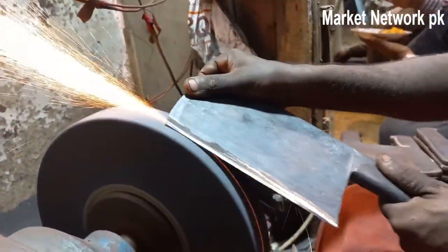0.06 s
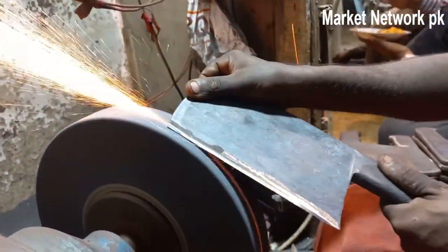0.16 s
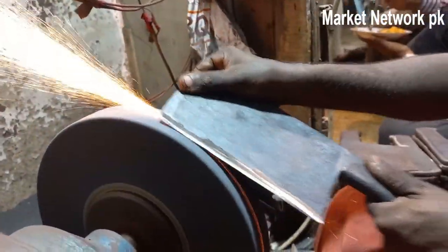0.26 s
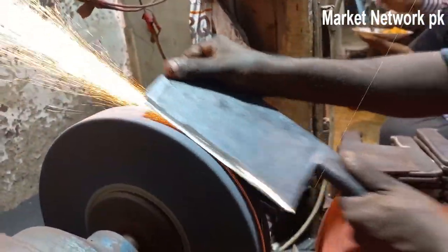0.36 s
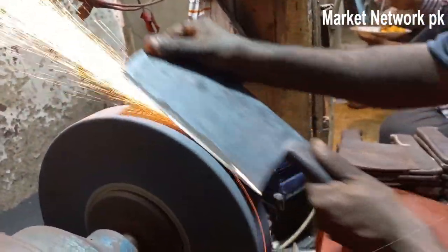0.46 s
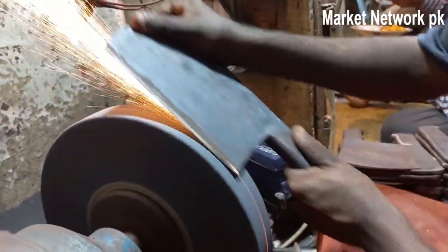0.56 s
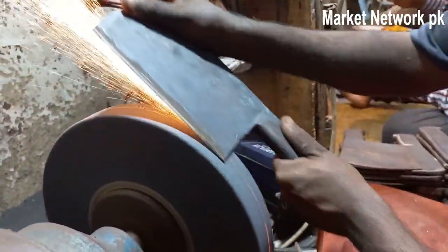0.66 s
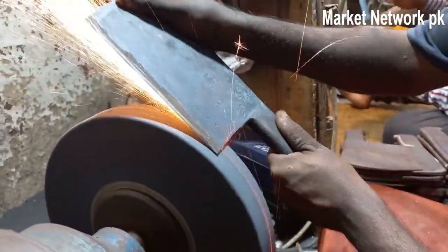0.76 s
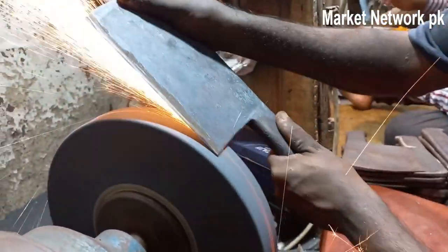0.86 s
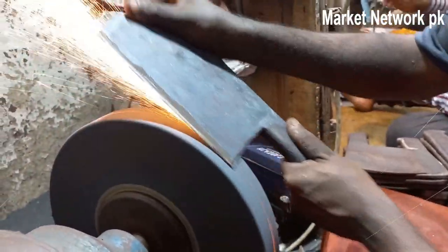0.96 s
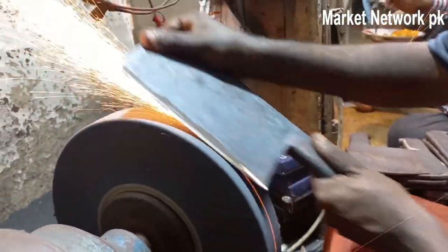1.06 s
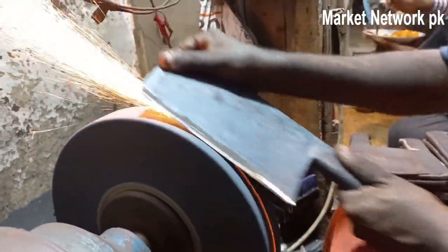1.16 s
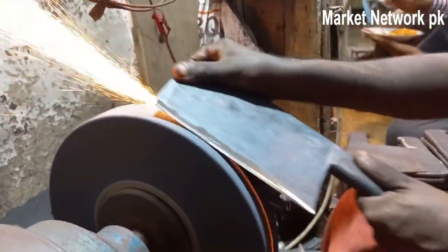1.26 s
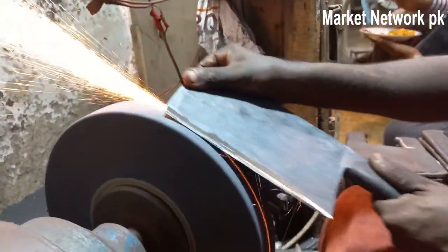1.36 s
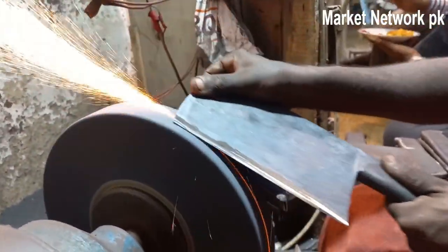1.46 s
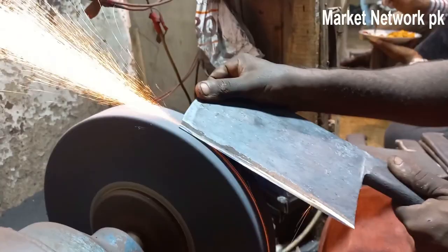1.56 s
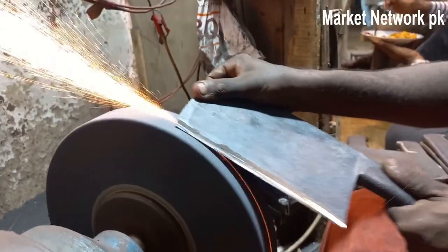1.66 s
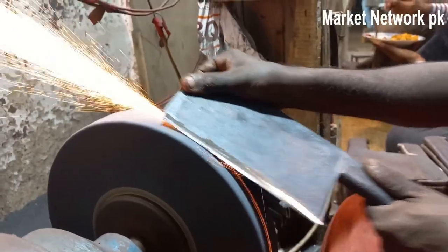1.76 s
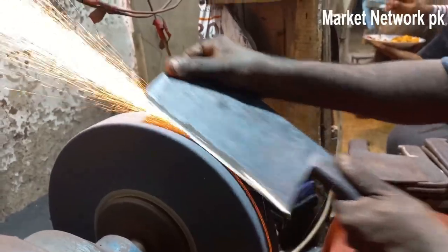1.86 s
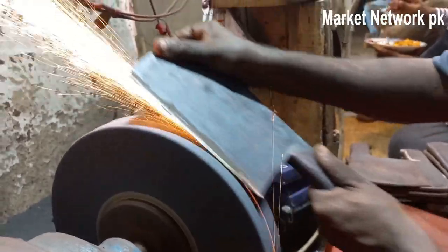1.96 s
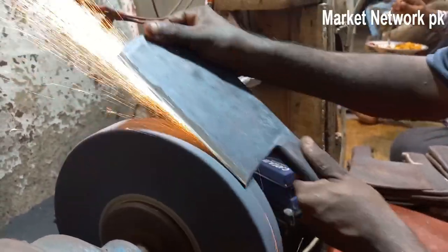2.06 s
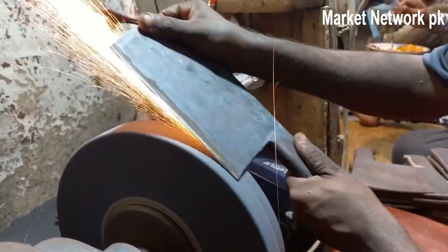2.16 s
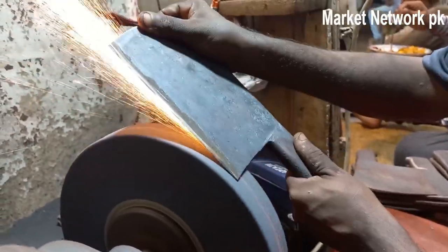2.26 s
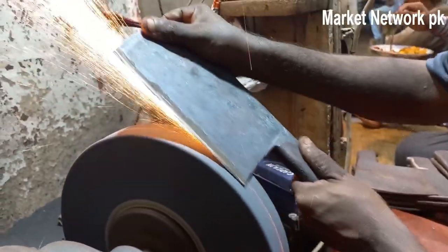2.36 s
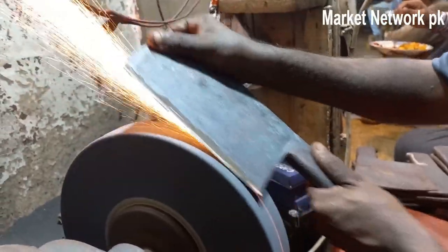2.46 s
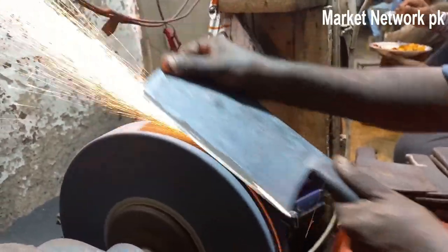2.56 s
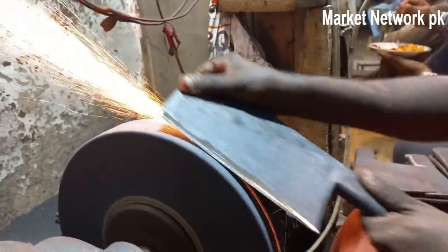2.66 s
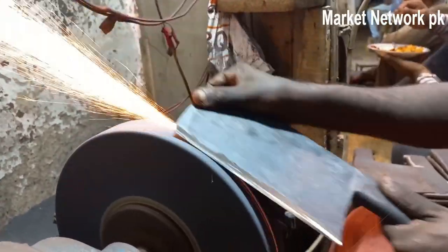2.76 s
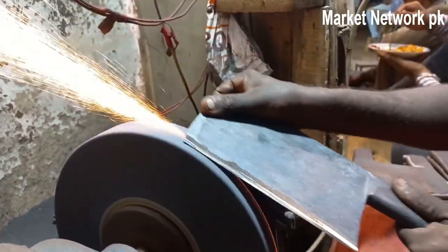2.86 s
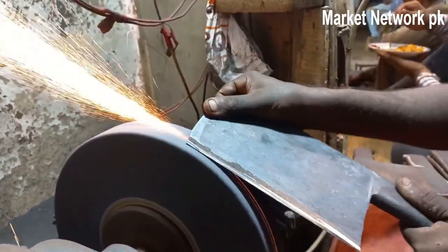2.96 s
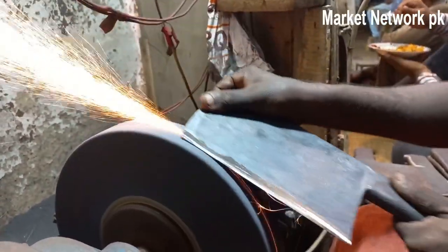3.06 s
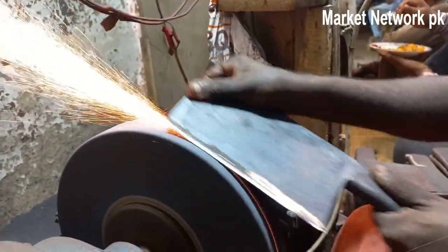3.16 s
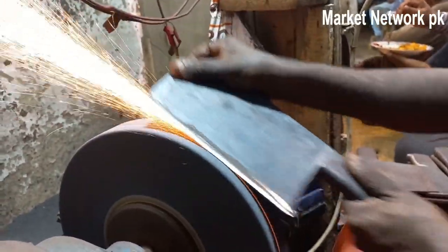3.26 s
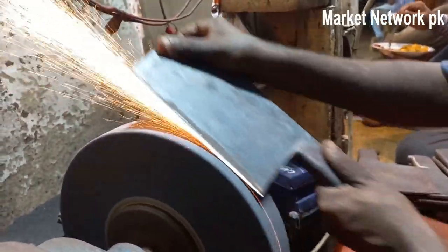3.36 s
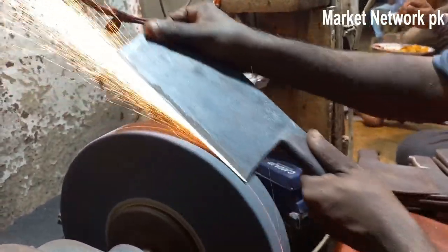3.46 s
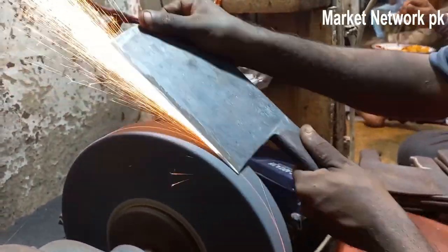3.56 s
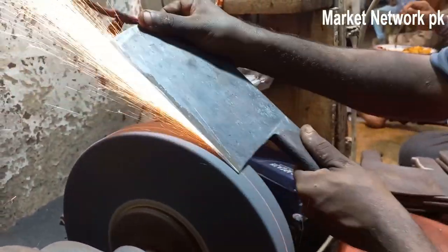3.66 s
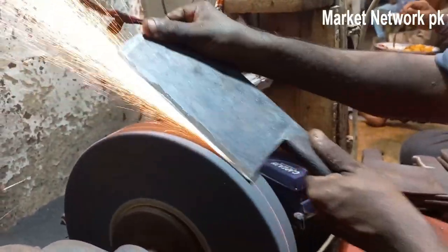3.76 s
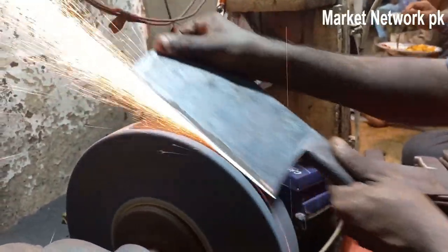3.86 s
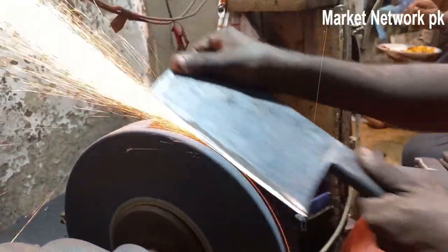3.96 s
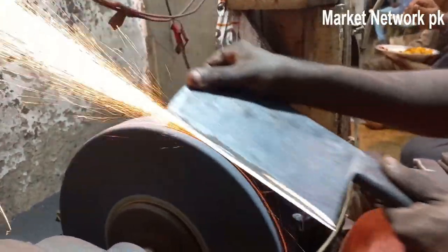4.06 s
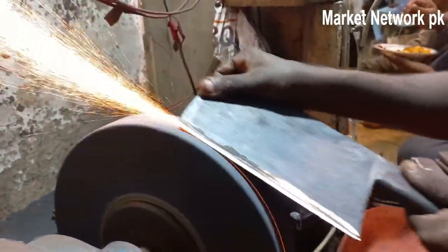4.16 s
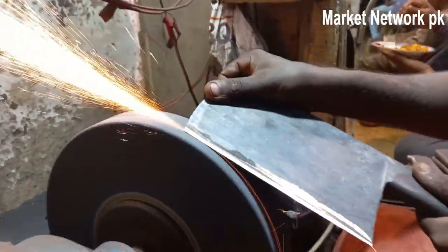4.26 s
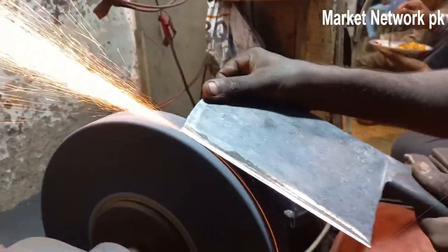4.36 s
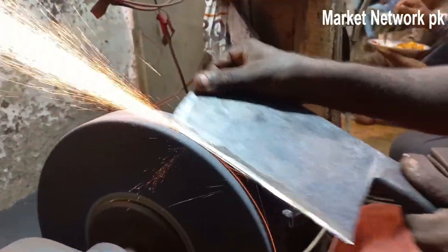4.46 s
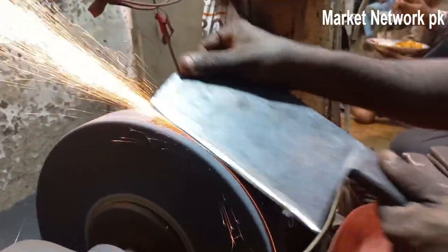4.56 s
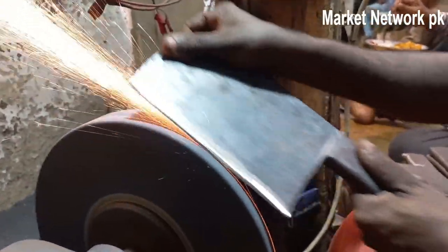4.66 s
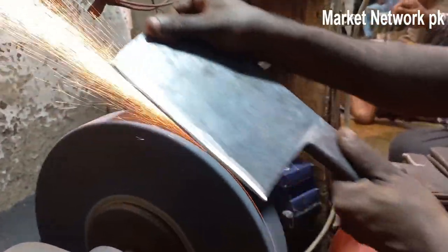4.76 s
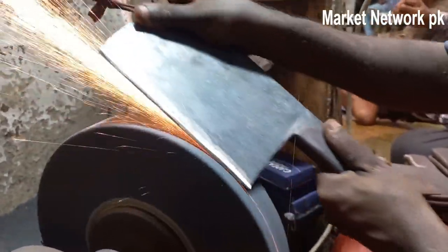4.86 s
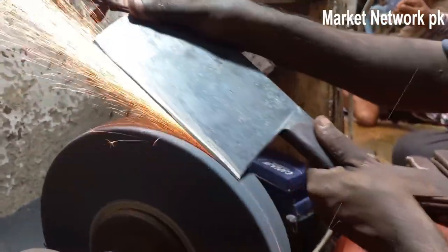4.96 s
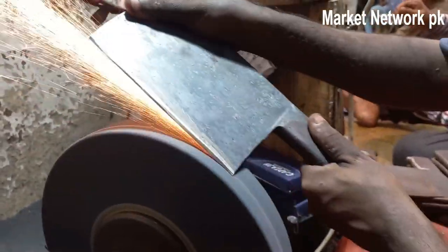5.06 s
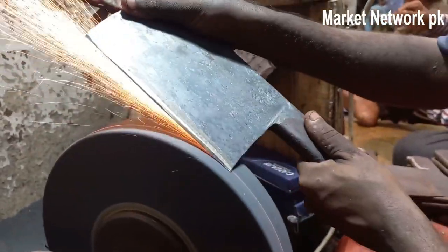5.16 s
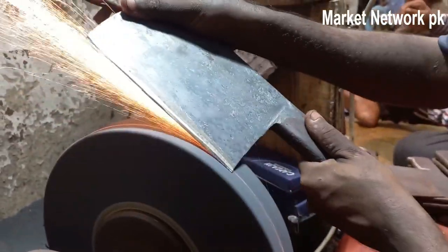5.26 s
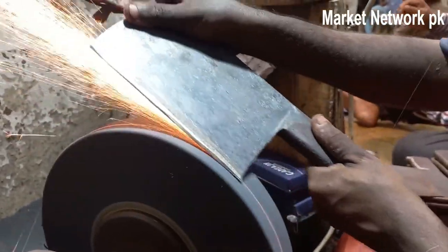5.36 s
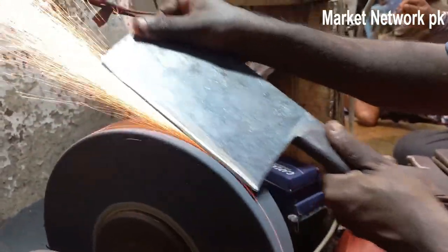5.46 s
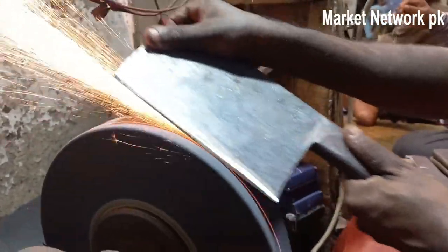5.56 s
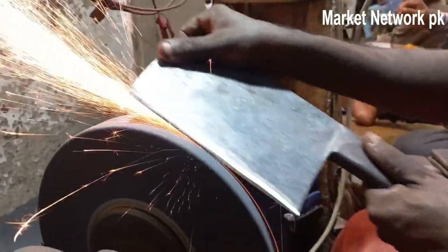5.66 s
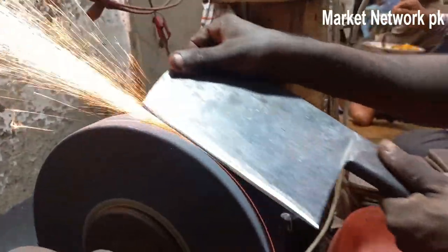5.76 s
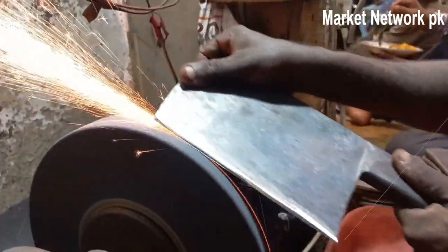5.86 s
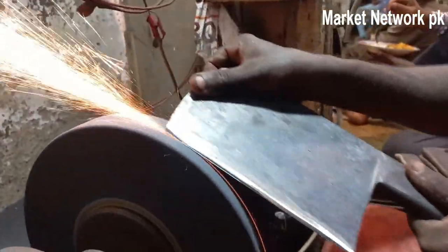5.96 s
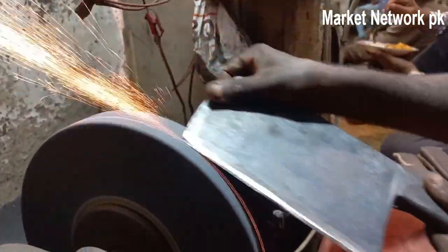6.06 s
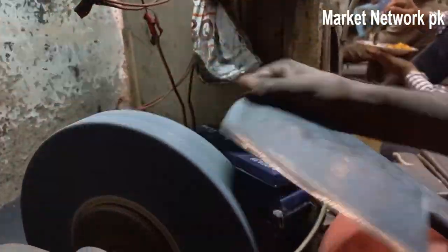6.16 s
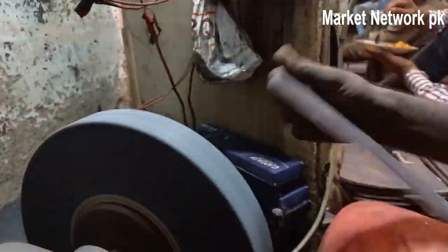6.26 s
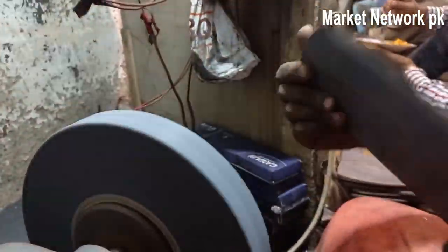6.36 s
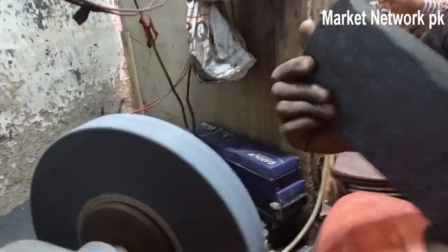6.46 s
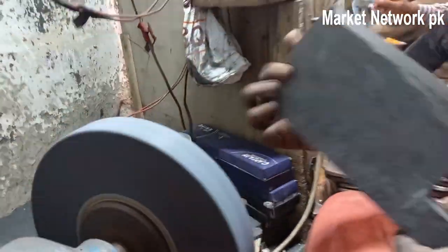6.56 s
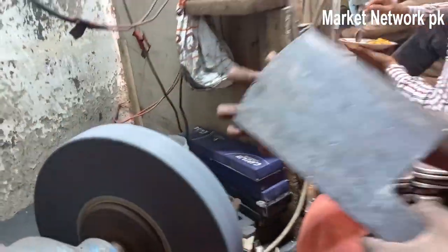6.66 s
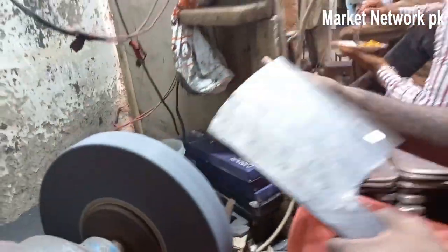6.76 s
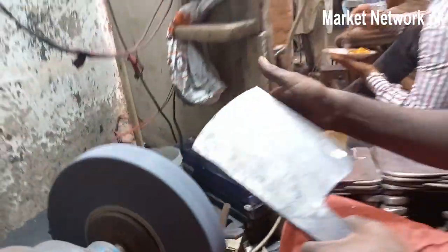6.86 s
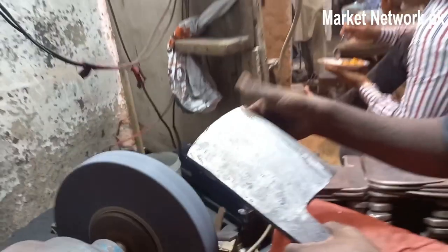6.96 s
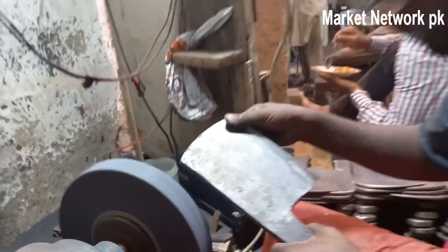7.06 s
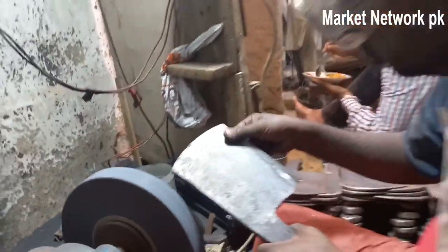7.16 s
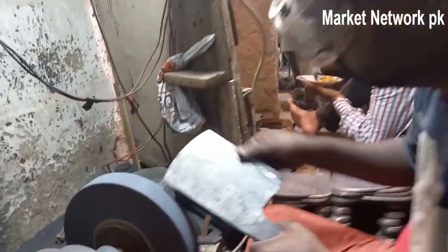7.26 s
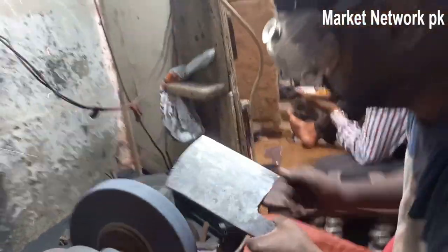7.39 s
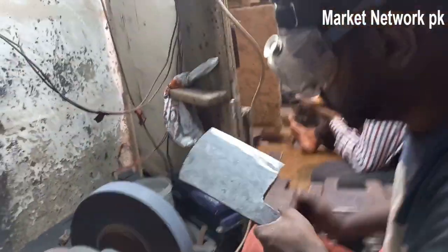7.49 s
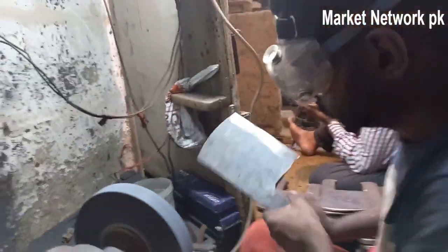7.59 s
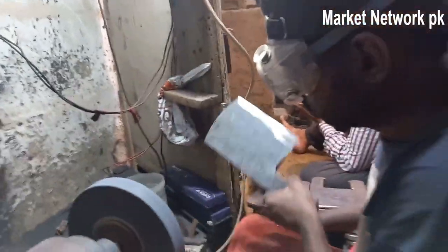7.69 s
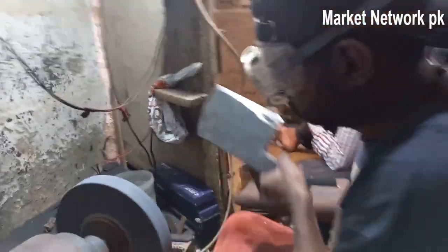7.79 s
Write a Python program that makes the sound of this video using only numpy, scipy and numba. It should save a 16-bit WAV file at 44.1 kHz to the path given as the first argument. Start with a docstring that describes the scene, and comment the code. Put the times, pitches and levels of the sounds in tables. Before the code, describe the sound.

Very close to the microphone in a small workshop, a broad steel blade is drawn back and forth over a motor-driven grinding wheel. The harsh, bright, gritty hiss stays nearly even in loudness while its metallic colour shifts with each stroke. Low wind puffs buffet the microphone over motor rumble. Around six seconds the blade bounces off, leaving a hum, then a light knock and steel clink further away.

```python
"""Cleaver on a grinding wheel

In a small workshop a steel cleaver is drawn to and fro, tip to heel, over a motor-driven wheel, close to the microphone.
Grit noise drives the blade's resonances, each by its own amount at the point of contact; a low drone comes and goes.
Rumble, rushing air and motor tones are shaped noise, and gusts from the wheel buffet the microphone in low puffs.
The blade is lifted, the grinder hums on, and a light knock and a steel clink, cracks with ringing modes, follow further off."""
import sys
import numpy as np
from scipy import signal
from scipy.fft import rfft, irfft, next_fast_len
from scipy.io import wavfile
from scipy.ndimage import uniform_filter1d
from numba import njit

SR = 44100
rng = np.random.default_rng(int(sys.argv[2]) if len(sys.argv) > 2 else 0)


def wrap_up_sound(samples):
    """Save the sound to the file named by the first command line argument, as 16-bit audio."""
    columns = np.atleast_2d(samples).T
    # keep every value between -1 and 1, then stretch to whole-number steps
    tamed = np.clip(columns, -1, 1)
    steps = np.round(tamed * 32767).astype(np.int16)
    wavfile.write(sys.argv[1], SR, steps)


N = 345303
TIME = np.arange(N) / SR   # seconds


def from_db(db):
    """Decibels to gain."""
    return 10 ** (np.asarray(db) / 20)


def rms_one(x):
    """Scale to rms 1."""
    return x / np.sqrt(np.mean(x ** 2) + 1e-20)


def in_time(rows):
    """A curve of (time [s], value) rows, joined by straight lines, at every sample."""
    return np.interp(TIME, *np.transpose(rows))


def drift(rate_hz):
    """Slow random wandering with spread 1: noise through two equal low-pass poles."""
    step = 40   # samples between the slow points
    pole = np.exp(-2 * np.pi * rate_hz * step / SR)
    settling = 2000   # points dropped while the filter settles
    noise = rng.standard_normal(N // step + settling + 2)
    slow = rms_one(signal.lfilter([1], [1, -2 * pole, pole ** 2], noise)[settling:])
    return np.interp(np.arange(N) / step, np.arange(len(slow)), slow)


def colour(x, spectrum):
    """Shape a sound by (frequency [Hz], level [dB]) points, joined on a log-frequency scale; rms 1."""
    hz, db = np.transpose(spectrum)
    size = next_fast_len(N)
    bins_hz = np.maximum(np.fft.rfftfreq(size, 1 / SR), 1)
    gain = from_db(np.interp(np.log(bins_hz), np.log(hz), db))
    return rms_one(irfft(rfft(x, size) * gain, size)[:N])


@njit
def glide(x, cosine, r):
    """A two-pole resonance with gain 1 on top, whose centre and damping move."""
    y = np.zeros(len(x))
    for i in range(2, len(x)):
        driven = (1 - r[i] ** 2) / 2 * (x[i] - x[i - 2])
        ringing = 2 * r[i] * cosine[i] * y[i - 1] - r[i] ** 2 * y[i - 2]
        y[i] = driven + ringing + 1e-18
    return y


def resonate(x, hz, width_hz, skirt):
    """A resonance, steady or moving, then one skirt times as wide that darkens its flanks."""
    cosine = np.cos(2 * np.pi * hz / SR) * np.ones(N)
    loss = np.pi * width_hz / SR * np.ones(N)
    narrow = glide(x, cosine, 1 - loss)
    return glide(narrow, cosine, 1 / (1 + skirt * loss))


def fade(x, seconds):
    """Each click becomes a step that dies away with this time constant."""
    return signal.lfilter([1], [1, -np.exp(-1 / (seconds * SR))], x + 1e-18)


def clicks(events):
    """One click for each (time [s], level [dB]) row."""
    out = np.zeros(N)
    for time_s, db in events:
        out[round(time_s * SR)] += from_db(db)
    return out


def contact_point():
    """Where the edge meets the wheel, 0 tip to 1 heel: even slides and rests, with rounded turns."""
    # strokes of the hand: (start [s], length [s], point of contact reached [0 tip - 1 heel])
    slides = [(0.0, 0.14, 0.043), (.3, 0.43, 0.868), (.97, 0.48, .07), (1.77, 0.49, .83), (2.42, 0.51, .05),
              (3.141, 0.47, 0.8), (3.83, 0.475, 0.027), (4.5, 0.64, 0.91), (5.31, 0.73, 0.034)]
    turn_s = 0.085   # time the hand takes to start or stop
    place = 0.19     # first point of contact
    corners = []
    for start, length, reached in slides:
        corners += [(start, place), (start + length, reached)]
        place = reached
    return uniform_filter1d(in_time(corners), size=round(turn_s * SR))


def wheel_face(pounding_db, keep, grain_db, uneven_db, wander_s):
    """Force of the grit: grains of all sizes, which partly come round again on the next turn; rms 1."""
    wheel_hz = 49.3   # turns per second
    turn = round(SR / wheel_hz)
    shape = (N // turn + 1, turn)   # one row for each turn
    grains = rng.standard_normal(shape) * from_db(grain_db * rng.standard_normal(shape))
    worn = signal.lfilter([1], [1, -np.clip(keep, 0, .9)], grains, axis=0)
    high_spots = rms_one(uniform_filter1d(rng.standard_normal(turn), size=60, mode="wrap"))
    face = (worn * from_db(uneven_db * high_spots)).ravel()
    # the turning runs a little early and late
    passing = (TIME + wander_s * drift(.5)) * SR
    # once a turn the rim bites suddenly and eases off
    runout = .5 - passing / turn % 1
    grit = face[passing.astype(int) % len(face)]
    return rms_one(grit * from_db(pounding_db * runout))


def pinned_edge(force, place):
    """Broad resonances of the edge pinned on the wheel, which rise as the contact moves heelwards."""
    # each swells and fades over a stretch of the edge:
    # (from point [0 tip - 1 heel], to point [0 - 1], from [Hz], to [Hz], relative level [dB])
    pinned = [(0.094, .6, 990, 1516, -39), (0.12, 0.623, 1950, 3160, -27), (0.18, .75, 3210, 4890, -26),
              (0.012, 0.383, 5150, 6300, -25)]
    out = np.zeros(N)
    for first, last, low_hz, high_hz, db in pinned:
        along = np.clip((place - first) / (last - first), 0, 1)
        centre_hz = low_hz + (high_hz - low_hz) * along
        ringing = resonate(force, centre_hz, width_hz=118, skirt=2.9)
        out += from_db(db) * np.sin(np.pi * along) * rms_one(ringing)
    return out


def grinding(skips_per_s, skip_db, skip_s, seat_db, bend_hz, wobble_hz, scratch_db, skirt, waver_db):
    """Grit drives each mode by its shape at the contact; the edge skips and seats itself anew."""
    # bending modes of the blade: (frequency [Hz], width [Hz], then eight relative levels [dB]
    # when ground at evenly spaced points from tip to heel)
    blade_modes = [(470, 250, -55, -58, -43, -36.5, -38, -48.5, -58.5, -39),
                   (978, 21, -33.5, -34, -32.5, -47, -41, -44.5, -50, -38),
                   (1155, 110, -36.5, -37, -54, -54, -61, -37, -51.5, -51),
                   (1325.4, 28, -33, -41, -32, -33.5, -42.5, -37, -35, -29.5),
                   (1889, 58, -54, -51, -35.5, -25.5, -32.5, -34.5, -52, -55),
                   (2126, 64, -39.5, -33, -43, -31.5, -37, -36, -49, -36),
                   (2254, 104, -31, -29, -21.5, -22.5, -27.5, -38, -29.5, -38),
                   (2647, 102, -24, -26, -28.5, -17, -28.5, -18, -22.5, -21),
                   (2900, 160, -58, -37, -54, -26.5, -47.5, -26.5, -24.5, -39),
                   (3496, 52, -16.5, -22.5, -28, -21, -28.5, -30.5, -27.5, -24.5),
                   (3674, 79, -25.5, -25.5, -50, -23, -63, -26, -32, -47),
                   (3934, 87, -26.5, -25, -19.5, -20.5, -23, -27, -26.5, -36),
                   (4510, 130, -22, -32, -29, -22, -22, -19, -23.5, -17),
                   (5020, 41, -46, -27.5, -23.5, -20.5, -38, -28, -29, -22),
                   (5390, 71, -26, -27, -32.5, -21.5, -27, -27, -29, -52),
                   (5744, 64, -21.5, -24.5, -18.5, -21, -20, -21, -27.5, -11.5),
                   (6270, 60, -23.5, -35, -26, -25, -46, -27, -30.5, -30),
                   (6660, 64, -31.5, -28, -47, -32, -24.5, -55, -27.5, -28),
                   (6860, 107, -34, -28, -23, -20, -24, -53, -28.5, -32),
                   (7470, 68, -25, -25.5, -22, -24, -27, -26, -39, -53),
                   (8010, 93, -31, -24.5, -27, -25, -28, -24.5, -21.5, -18.5),
                   (8870, 130, -30, -32.5, -27, -43, -27.5, -31, -32.5, -19),
                   (9306, 160, -28, -23, -26, -22.5, -25.5, -28.5, -28.5, -36),
                   (9920, 150, -31, -40, -25, -46, -36, -36, -22, -32),
                   (10330, 92, -33.5, -23, -24, -27, -24.5, -24, -20.5, -43),
                   (10780, 110, -36, -53, -39, -33, -36, -30, -32, -33),
                   (11350, 180, -37, -33.5, -27, -40, -37, -49, -32.5, -41),
                   (11630, 85, -47, -36, -41, -32, -37, -33, -40, -48),
                   (12180, 86, -35, -27.5, -31, -28.5, -27, -31, -29, -34),
                   (13040, 75, -35, -34, -27, -24, -40, -31, -23, -37),
                   (13520, 120, -38, -36, -39, -39, -39, -43, -41, -38),
                   (13900, 90, -41, -34, -41, -44, -30, -40, -41, -45),
                   (14500, 120, -44, -33, -43, -40, -44, -43, -35, -38),
                   (14800, 58, -31, -40, -30, -24.5, -31, -31, -25.5, -27)]
    # hiss of the grit itself: (frequency [Hz], relative density [dB per Hz])
    scratch_colour = [(400, -34), (800, -18.5), (1600, -4.5), (2400, 8), (4000, -6), (7000, -13),
                      (10500, -3), (12800, 4.5), (15500, 6)]
    # the edge bounces as it leaves the wheel: (time [s], added force over the steady force [dB])
    bounces = [(6.110, 10), (6.138, -7), (6.164, 14)]
    lift_s = 6.172       # the blade leaves the wheel
    grind_db = -12       # level of the evened grinding
    free_width_hz = 20   # width of the blade's modes once it is off the wheel

    place = contact_point()
    touching = TIME < lift_s
    skips = rng.random(N) < skips_per_s / SR
    seating = np.cumsum(skips)
    # each landing bites harder for a moment
    bites = from_db(skip_db) * skips * np.minimum(rng.exponential(1, N), 3)
    landing = fade(bites + clicks(bounces), skip_s)

    # the stiff heel follows the out-of-round wheel worst
    pounding_db = 13 * np.clip(place, 0, 1) ** 3
    steady_force = wheel_face(pounding_db, keep=0.33, grain_db=3.5, uneven_db=0.73, wander_s=.0003)
    force = steady_force * (1 + landing) * touching
    sound = from_db(scratch_db) * colour(force, scratch_colour) + pinned_edge(force, place)

    wobble = wobble_hz * drift(9.7)
    for hz, width_hz, *shape_db in blade_modes:
        coupling = np.interp(place, np.linspace(0, 1, len(shape_db)), from_db(shape_db))
        # short bending waves feel a small change of seating most
        seat_spread_db = seat_db * min(hz / 5000, 1) ** .5
        seated = rms_one(from_db(seat_spread_db * rng.standard_normal(size=4000)))
        drive = force * seated[seating] * coupling
        # the wheel stiffens a mode, and so raises it, where that mode moves most
        bent_hz = hz + bend_hz * (coupling - coupling.mean()) / coupling.max() + wobble
        # off the wheel the modes take on their free width
        damped_hz = np.where(touching, width_hz, free_width_hz)
        ringing = resonate(drive, bent_hz, damped_hz, skirt)
        # a narrow mode passes less of the noise, so it is raised to match
        sound = sound + ringing * np.sqrt(SR / (np.pi * width_hz))

    # the grinding is evened to a nearly steady loudness; the last gain holds after the lift
    power = uniform_filter1d(sound[touching] ** 2, size=2000)
    evening_gain = from_db(grind_db + waver_db * drift(6)[touching]) / np.sqrt(power)
    return sound * np.interp(TIME, TIME[touching], evening_gain)


def grinder(rumble_db, rush_db, hiss_db, lumpy_db):
    """The motor's rumble and tones, and air torn along by the wheel, all as shaped noise."""
    # the running grinder: (time [s], rumble level before the rumble_db trim [dB])
    rumble_level = [(0.0, -39), (2.57, -41), (2.75, -38.5), (4.47, -44.5), (4.95, -40), (6.32, -41.5),
                    (7.83, -34.5)]
    # rumble colour: (frequency [Hz], relative density [dB per Hz])
    rumble_colour = [(18, -69), (30, -44), (60, -2.5), (123, 0.5), (161, 1.5), (226, -7.5), (268, -6),
                     (297, -11.5), (461, -15.5), (604, -28), (781, -25.5), (900, -22.5), (1170, -43),
                     (1980, -120)]
    # air rushing off the wheel, and shop noise:
    # (time [s], low rush level before the rush_db trim [dB], hiss level before the hiss_db trim [dB])
    air_level = np.array([(6.3, -36, -39), (7.274, -35, -42), (7.638, -29.5, -38), (7.83, -28.5, -36)])
    # colour of the low rush: (frequency [Hz], relative density [dB per Hz])
    rush_colour = [(250, -13), (420, -7), (560, -6), (800, -10), (1300, -7), (1700, -18), (2600, -12.5),
                   (6000, -55)]
    # colour of the hiss: (frequency [Hz], relative density [dB per Hz])
    hiss_colour = [(1000, -32), (1700, -8.5), (2200, -15), (3040, -11), (3560, -9), (5060, -13),
                   (5710, -12), (7890, -19.5), (15500, -19.5)]
    # tones of the motor: (frequency [Hz], width [Hz], level relative to the low rush [dB])
    motor_tones = [(265.4, 8, -8), (533, 35, -8.5), (1093, 9.8, -16), (1175, 4.7, -6.5), (1690, 13, -14),
                   (3530, 22, -14)]

    lumps_db = lumpy_db * drift(5.4)
    rumble = colour(rng.standard_normal(N), rumble_colour)
    rumble = rumble * from_db(in_time(rumble_level) + rumble_db + lumps_db)

    rush = colour(rng.standard_normal(N), rush_colour)
    tones = np.zeros(N)
    for hz, width_hz, db in motor_tones:
        tone = resonate(rng.standard_normal(N), hz, width_hz, skirt=1)
        tones += from_db(db) * rms_one(tone)
    low_air = (rush + tones) * from_db(in_time(air_level[:, :2]) + rush_db)

    hiss = colour(rng.standard_normal(N), hiss_colour)
    hiss = hiss * from_db(in_time(air_level[:, ::2]) + hiss_db)
    return rumble + hiss + low_air


def drone():
    """A low, narrow tone of resonant noise that fades in, climbs steadily and fades out."""
    # each coming of the drone: (start [s], length [s], starting pitch [Hz], level [dB])
    drones = [(-.3, 0.67, 141.7, -30), (4.15, 1.16, 136.1, -35), (5.2, 2.46, 139.2, -36.5)]
    climb_hz_per_s, fade_s, width_hz = 19.6, 0.23, 8
    out = np.zeros(N)
    for start, length, hz, db in drones:
        age = np.clip(TIME - start, 0, length)
        swell = np.minimum(np.minimum(age, length - age) / fade_s, 1)
        tone = resonate(rng.standard_normal(N), hz + climb_hz_per_s * age, width_hz, skirt=1)
        out += from_db(db) * swell * rms_one(tone)
    return out


def gusts(rise_s, fall_s, flutter_db, level_db):
    """Eddies hit the microphone port as low puffs that rise, flutter while they last, and die away."""
    # puffs of wind: (start [s], length [s], level before the level_db trim [dB])
    puffs = [(0.168, 0.019, -19.5), (0.405, 0.029, -19), (.59, 0.038, -21), (0.689, 0.018, -17),
             (.79, .055, -24), (0.906, 0.02, -23), (1.318, 0.1, -21.5), (1.524, 0.019, -20),
             (1.847, 0.043, -19.5), (2.552, .1, -21), (2.73, 0.029, -17.5), (2.876, 0.14, -22.5),
             (3.209, 0.025, -15), (3.336, 0.069, -21), (4.978, 0.081, -21.5), (5.152, 0.019, -23),
             (7.132, 0.14, -20.5), (7.49, 0.057, -19)]
    swell = np.zeros(N)
    for start, length, db in puffs:
        age = TIME - start
        rise = np.clip(age / rise_s, 0, 1)
        fall = np.exp(-np.maximum(age - length, 0) / fall_s)
        swell += from_db(db) * rise * fall
    # (frequency [Hz], relative density [dB per Hz])
    puff_colour = [(30, -35), (55, -16), (80, 4.5), (170, 1.5), (300, -6.5), (500, -16), (900, -35), (3000, -63)]
    air = colour(rng.standard_normal(N), puff_colour)
    return from_db(level_db + flutter_db * drift(28)) * swell * air


def strike(events, modes, crack_db, crack_s, crack_hz):
    """A blow: a short crack of noise and the decaying modes it sets ringing."""
    blows = clicks(events)
    crack_colour = [(crack_hz / 8, -15), (crack_hz / 3, 0), (crack_hz, -2), (2 * crack_hz, -18)]
    crack = colour(rng.standard_normal(N), crack_colour)
    out = from_db(crack_db) * fade(blows, crack_s) * crack
    for k, (hz, db, t60_s) in enumerate(modes):
        r = from_db(-60 / (t60_s * SR))   # decay per sample
        w = 2 * np.pi * hz / SR           # radians per sample
        ringing = signal.lfilter([0, np.sin(w)], [1, -2 * r * np.cos(w), r * r], blows + 1e-18)
        out += (-1) ** k * from_db(db) * ringing   # every other mode starts downwards
    return out


def workshop(x):
    """Reflections from close walls: a short, dying noise tail, without the direct sound."""
    t60_s, first_echo_s = 0.086, .004
    t = TIME[:SR // 2]
    tail = rng.standard_normal(len(t)) * from_db(-60 * t / t60_s) * (t > first_echo_s)
    return signal.fftconvolve(x, tail / np.sqrt(np.sum(tail ** 2)))[:N]


def scene():
    """The blade grinds close by; the blows come from further off, with more of the room."""
    # a dull knock, two contacts: (time [s], relative level [dB])
    knocks = [(7.384, -26), (7.389, -19)]
    # modes of the knock: (frequency [Hz], relative level [dB], decay by 60 dB [s])
    knock_modes = [(1130, -3, 0.037), (1470, -11, .03), (1870, 0, 0.038), (2330, -8, .02),
                   (2890, -4, 0.031), (3450, -16, .02), (4100, -15, .025)]
    # a clink of steel on steel, two contacts: (time [s], relative level [dB])
    clinks = [(7.433, -20.5), (7.438, -36)]
    # modes of the clink: (frequency [Hz], relative level [dB], decay by 60 dB [s])
    clink_modes = [(1136, -2, 0.037), (2275, -20, 0.6), (2833, -9, 0.18), (2985, -8, .2),
                   (5340, -7.5, 0.55), (5670, -3, 0.2), (5805, -6, .14), (5370, -6, 0.2), (6160, -9, .12),
                   (5990, -7, 0.34), (6620, -11, .24), (7400, -6, .15), (8900, -10, .12), (9205, -9, 0.38),
                   (10040, -5, 0.21), (11710, -1, 0.17), (12150, -7, .14), (13060, -1.5, 0.39),
                   (13560, -10, 0.27), (15110, -15, .25), (15530, -8, .14)]

    blade = grinding(skips_per_s=45, skip_db=-0.5, skip_s=0.00064, seat_db=3.0, bend_hz=59,
                     wobble_hz=7.6, scratch_db=-27.0, skirt=4.57, waver_db=0.6)
    knock = strike(knocks, knock_modes, crack_db=-5.0, crack_s=0.0031, crack_hz=3800)
    clink = strike(clinks, clink_modes, crack_db=-4, crack_s=0.0088, crack_hz=13200)
    blows = from_db(-1.5) * (knock + clink)
    blade_to_room_db = -9.5   # the near blade sends less to the walls
    reflected = workshop(from_db(blade_to_room_db) * blade + blows)
    steady = grinder(rumble_db=6.5, rush_db=-5.5, hiss_db=1, lumpy_db=1.45) + drone()
    wind = gusts(rise_s=0.0071, fall_s=0.011, flutter_db=3.0, level_db=-4.5)
    return (blade + blows + reflected + steady + wind)[None]


def record(dry):
    """The deep bass is thinned, the highest peaks are rounded, the top is cut."""
    bass_hz, ceiling, top_hz = 45, .98, 15750
    high_pass = signal.butter(4, bass_hz, "high", fs=SR, output="sos")
    thinned = signal.sosfilt(high_pass, dry)
    rounded = thinned / (1 + (thinned / ceiling) ** 8) ** (1 / 8)
    # a steep cut: 0.1 dB ripple below, 95 dB down above
    low_pass = signal.ellip(14, .1, 95, top_hz, fs=SR, output="sos")
    return signal.sosfilt(low_pass, rounded)


dry = scene()
out = record(dry)
wrap_up_sound(out)
```